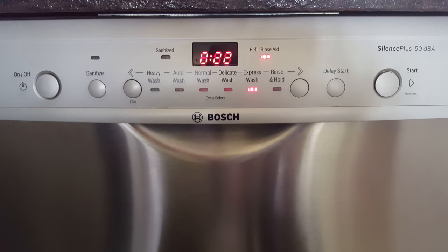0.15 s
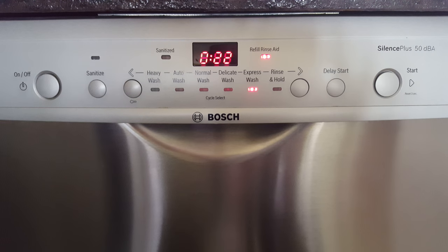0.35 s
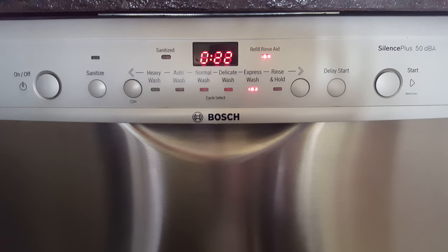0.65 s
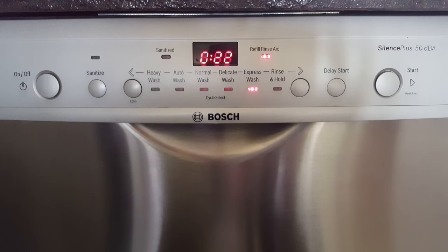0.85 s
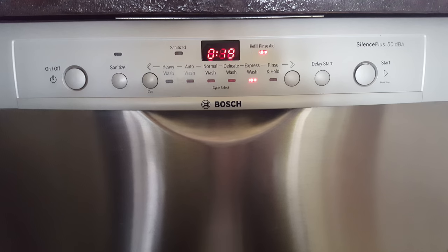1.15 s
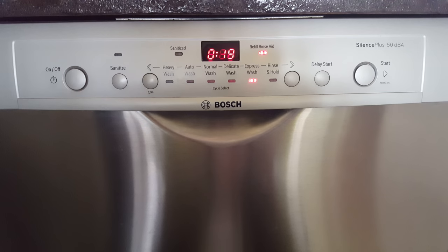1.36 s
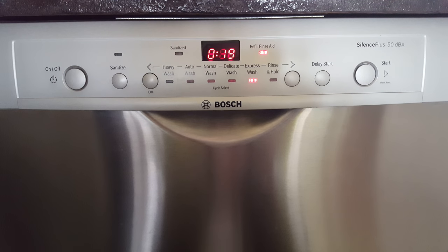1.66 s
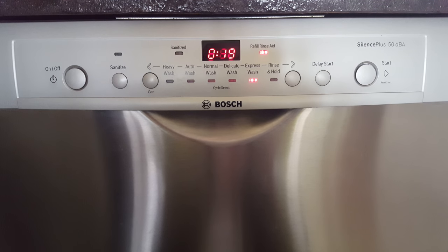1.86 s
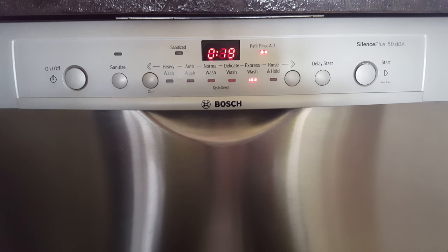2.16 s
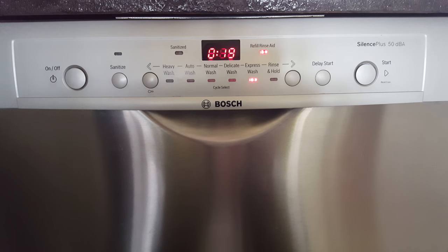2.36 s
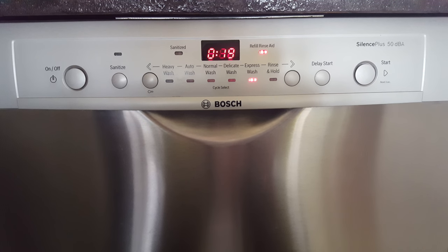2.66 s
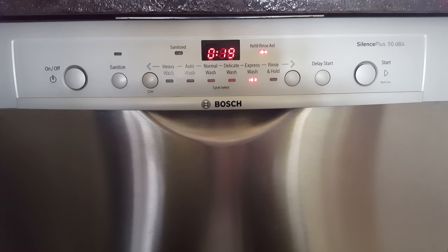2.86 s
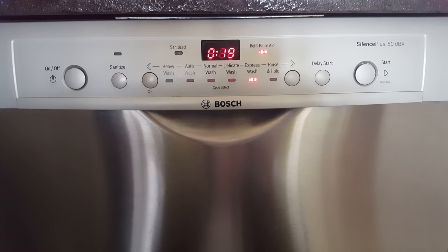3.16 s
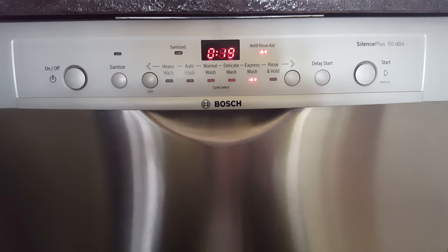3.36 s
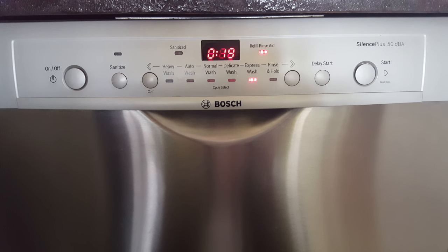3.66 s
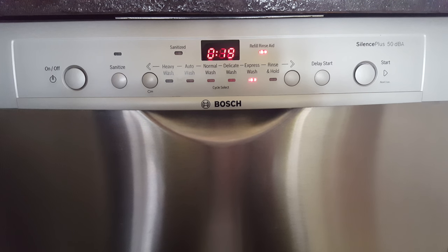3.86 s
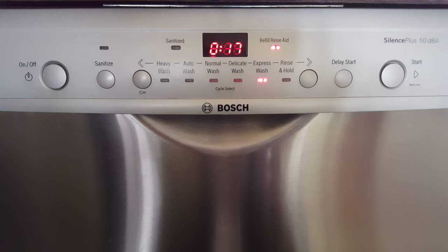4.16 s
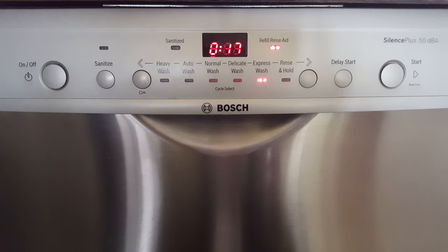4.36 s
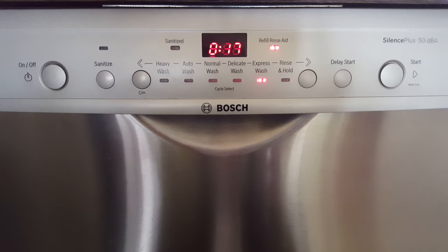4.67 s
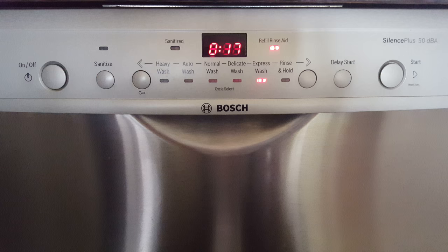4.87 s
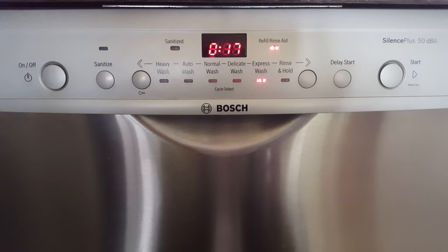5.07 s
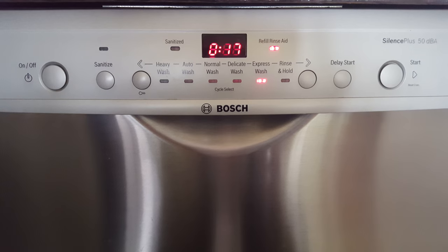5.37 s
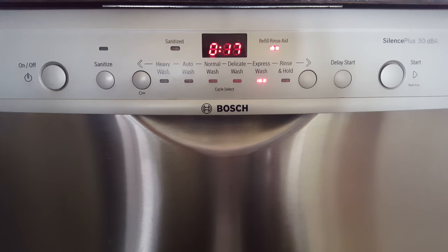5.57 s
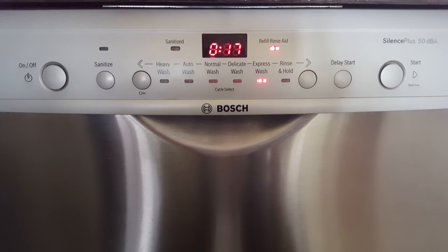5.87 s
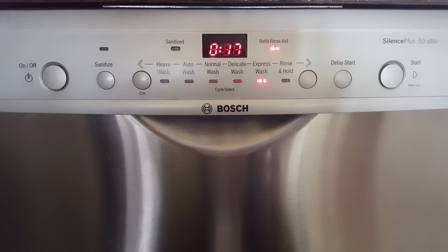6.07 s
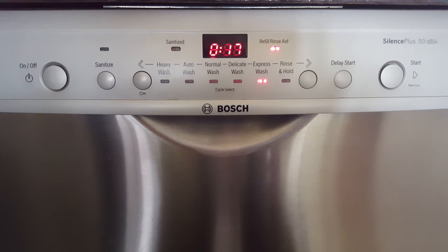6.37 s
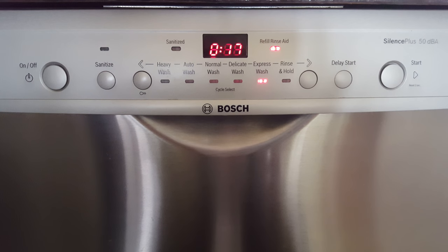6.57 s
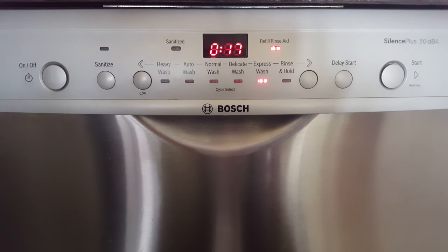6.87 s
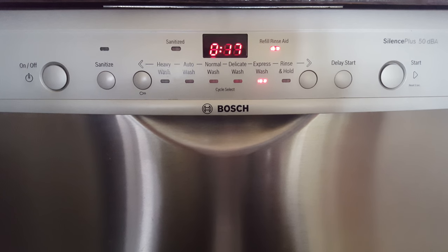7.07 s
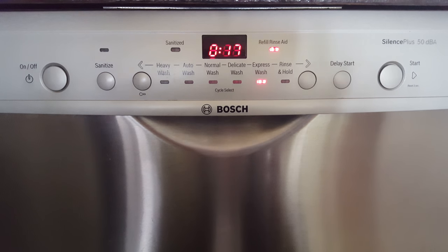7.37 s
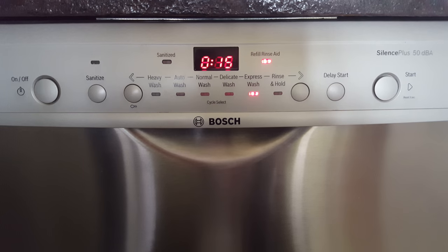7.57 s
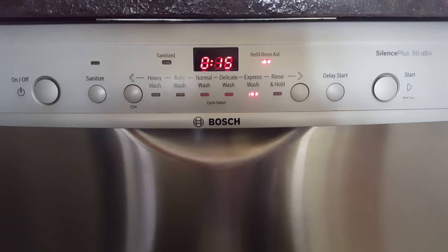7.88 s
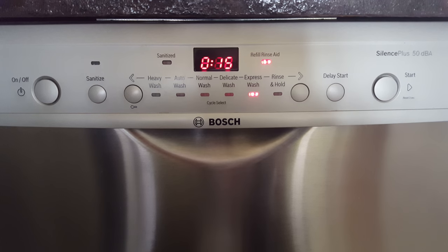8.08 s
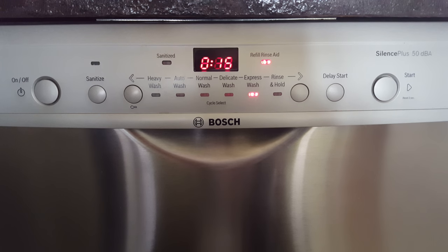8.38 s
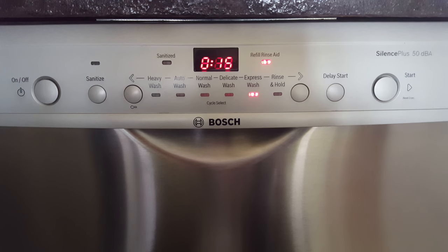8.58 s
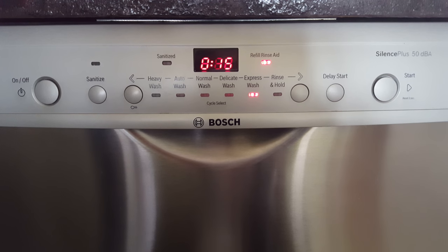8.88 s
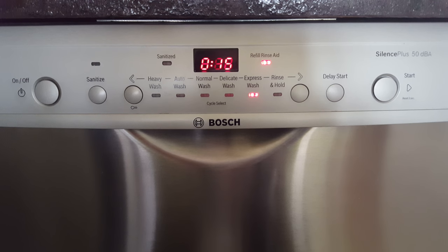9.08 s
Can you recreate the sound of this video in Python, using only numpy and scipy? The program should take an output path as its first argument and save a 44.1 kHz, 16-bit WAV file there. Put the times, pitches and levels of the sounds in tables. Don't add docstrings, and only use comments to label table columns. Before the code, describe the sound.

A dishwasher works behind its closed steel door, heard close up in a kitchen in stereo. Throughout, a low wavering pump drone with boomy cabinet resonance swells, stumbles and briefly breaks off, under muffled water wash and a soft, faint hiss. A barely audible thin high whine runs until about 7.5 s. At 0.5 s comes a hard dull knock, then dish clacks and rattles until about 0.95 s, where a tiny jump changes to another moment of the wash. Sparse ticks and drips follow, with a short crockery rattle at 2.3 to 2.5 s. Another slight jump falls at 4.1 s. The drone continues mostly alone until clacks and scuffs at 5.7 to 6.0 s. After isolated drips, the last jump comes at 7.5 s. A drip sounds at 8.5 s, then dishes knock and rattle again from 8.9 to 9.15 s, the hum still running.

```python
import sys
import numpy as np
from scipy import signal
from scipy.fft import rfft, irfft, next_fast_len
from scipy.io import wavfile
from scipy.ndimage import uniform_filter1d

SR = 44100
rng = np.random.default_rng(int(sys.argv[2]) if len(sys.argv) > 2 else 0)


def master(y):
    cut = np.clip(np.atleast_2d(y).T, -1, 1)
    pcm = np.round(cut * 32767)
    wavfile.write(sys.argv[1], SR, pcm.astype(np.int16))


def attenuation_scalar(level_db):
    decades = np.asarray(level_db, float) / 20
    return 10 ** decades


N = 406602
PADDED = next_fast_len(N)
HZ = np.maximum(np.fft.rfftfreq(PADDED, 1 / SR), 1)


def rms_one(x):
    return x / np.sqrt(np.mean(x ** 2) + 1e-20)


def in_time(rows):
    s, *columns = np.transpose(rows)
    return [np.interp(np.arange(N) / SR, s, c) for c in columns]


def swells(rows, width_s):
    t = np.arange(0, N / SR + .01, .005)
    change_db = sum(db * np.exp(-.5 * ((t - s) / width_s) ** 2) for s, db in rows)
    return in_time(np.transpose([t, change_db]))[0]


def drift(rate):
    r = np.exp(-80 * np.pi * rate / SR)
    chance = rng.standard_normal(N // 40 + 2002)
    slow = signal.lfilter([1], [1, -2 * r, r * r], chance)[2000:]
    return np.interp(np.arange(N) / 40, np.arange(len(slow)), rms_one(slow))


def at_hz(points):
    hz, value = np.transpose(points)
    return np.interp(np.log(HZ), np.log(hz), value)


def shaped(x, gain):
    return irfft(rfft(x, PADDED) * gain, PADDED)[..., :N]


def resonances(modes, steep):
    power = 0
    for hz, width, db in modes:
        detuning = (HZ - hz ** 2 / HZ) / width
        power = power + attenuation_scalar(2 * db) / (1 + detuning ** 2) ** steep
    return np.sqrt(power)


# f/Hz, likeness/1
LIKENESS = [(30, .95), (60, .989), (130, .997), (250, .96), (390, .72), (500, .9), (800, .62), (1100, .33),
            (3000, .3), (6000, .42), (15000, .3)]
# f/Hz, left-right level/dB
BALANCE_DB = [(30, .5), (200, .2), (700, -.4), (2400, -.6), (4400, -1.2), (8000, .8), (14000, 1.5)]
PORT_LAG_S = 0.000234


def at_ports(direct, left, right, gain):
    alike = np.clip(at_hz(LIKENESS), 0, 1)
    late = np.exp(-2j * np.pi * HZ * PORT_LAG_S * np.clip(HZ / 800, 0, 1))
    shared = np.sqrt(alike) * rfft(direct, PADDED) * [np.ones_like(late), late]
    own = np.sqrt(1 - alike) * rfft([left, right], PADDED)
    tilt = attenuation_scalar(at_hz(BALANCE_DB) * [[.5], [-.5]])
    return rms_one(irfft((shared + own) * gain * tilt, PADDED)[:, :N])


def evened(x, size, share):
    power = np.mean(x ** 2, axis=0)
    level = uniform_filter1d(uniform_filter1d(power, size=size), size=size)
    return rms_one(x / (level + 0.028) ** (share / 2))


# t/s, left step/1, right step/1
JOINTS = [
    (.95356, -.028, -.022),
    (4.08386, .032, .034),
    (7.49321, .036, .019),
]


def per_moment(values):
    return np.take(values, np.searchsorted([s for s, left, right in JOINTS], np.arange(N) / SR))


def joints():
    jumps = np.zeros((2, N))
    for s, left, right in JOINTS:
        jumps[:, round(s * SR)] = left, right
    return signal.lfilter([1], [1, -np.exp(-1 / (0.0007 * SR))], jumps + 1e-18)


# left t/s, right t/s, level/dB
ECHOES = [(.0031, .0038, -16), (.0074, .0066, -17), (.0123, .0139, -18), (.0197, .0181, -19),
          (.0283, .0307, -21)]


def kitchen(x):
    echoes = sum(attenuation_scalar(db) * np.exp(-2j * np.pi * HZ * [[left], [right]]) for left, right, db in ECHOES)
    return shaped(x, 1 + echoes / (1 + (500 / HZ) ** 4))


# f/Hz, level/dB
WHINE = [(9711, -86), (10022, -94), (10333, -85)]
WHINE_STOP_S = 7.49


def whine():
    t = np.arange(N) / SR
    lines = sum(attenuation_scalar(db + 3) * np.sin(2 * np.pi * hz * t + [[0], [.8]]) for hz, db in WHINE)
    return lines * (t < WHINE_STOP_S)


# f/Hz, width/Hz, level/dB in each of the four moments
GAPS = [(5200, 740, -80, -78.5, -77, -80), (9300, 900, -81, -87, -87, -82),
        (10500, 700, -79, -89, -79.5, -85), (10770, 380, -93, -92, -93, -80),
        (11300, 450, -82, -81, -83.5, -81), (12560, 740, -83, -82, -82, -82)]


def gaps():
    white = rng.standard_normal((2, N))
    out = 0
    for hz, width, *levels_db in GAPS:
        breath = rms_one(shaped(white, resonances([(hz, width, 0)], steep=3.1)))
        out = out + attenuation_scalar(per_moment(levels_db) + 1.2 * drift(0.5)) * breath
    return out


def drops():
    out = np.zeros((2, N))
    for hz in np.geomspace(1500, 12500, num=10):
        sizes = attenuation_scalar(1.2 * np.minimum(rng.exponential(1, N), 3))
        born = (rng.random(N) < 14.0 / SR) * sizes
        sides = attenuation_scalar(rng.normal(0, 3.5, (2, N)))
        r, w = attenuation_scalar(-60 * hz / (9.0 * SR)), 2 * np.pi * hz / SR
        poles = [1, -2 * r * np.cos(w), r * r]
        ring = signal.lfilter([0, np.sin(w)], poles, born * sides + 1e-18)
        level_db = -53 - 3.8 * np.log2(hz / 1500)
        out += attenuation_scalar(level_db) * signal.lfilter([1 - r, 0, r - 1], poles, ring)
    return out


def splashes(grain_db, flicker_db):
    sizes = attenuation_scalar(grain_db * np.minimum(rng.exponential(1, N), 6))
    swell = attenuation_scalar(flicker_db * (drift(32) + 0.6 * drift(13.5)))
    return rng.standard_normal((3, N)) * sizes * swell


# f/Hz, spectral level/dB per Hz
WASH = [(280, -7.5), (375, -9), (480, -5), (507, -5.5), (578, -3.5), (630, -8), (688, -6.5), (855, -7.5),
        (1050, -12.5), (1500, -12.5), (2110, -19), (2660, -23), (6500, -44), (8450, -60), (14300, -120)]
# f/Hz, spectral level/dB per Hz
MIST = [(3530, -6.5), (6000, 0), (9040, -4), (10700, 2), (13000, -4), (15200, -3.5), (16000, -24)]
WASH_DB = [-47.5, -48.5, -48, -48]
MIST_DB = [-66, -66.5, -66.5, -66]
JET_SWAY_DB, JET_SWAY_PER_S = 0.93, 0.51


def jets():
    sway_db = JET_SWAY_DB * drift(JET_SWAY_PER_S)
    wash_db, mist_db = per_moment(WASH_DB) + 0.34 * sway_db, per_moment(MIST_DB) + sway_db
    out = 0
    for spectrum, level_db, grain_db, split_hz in ((WASH, wash_db, 1.5, 1800), (MIST, mist_db, 2.2, 9500)):
        below = 1 / (1 + (HZ / split_hz) ** 4)
        gain = attenuation_scalar(at_hz(spectrum))
        halves = [gain * np.sqrt(below), gain * np.sqrt(1 - below)]
        parts = [np.linalg.norm(h) * at_ports(*splashes(grain_db, flicker_db=1.71), h) for h in halves]
        out = out + attenuation_scalar(level_db) * rms_one(sum(parts))
    return out


# t/s, peak level/dB, centre f/Hz, rim against body level/dB
TOUCHES = [(0.6495, -38, 2300, -11), (0.68, -35, 1460, -4), (0.6978, -28.5, 1760, -25),
           (0.725, -39, 1500, -4), (0.845, -45, 1500, -2), (0.8167, -35, 1400, -12),
           (0.8232, -29.5, 1440, -9), (0.934, -45, 2100, -14), (1.131, -46, 2000, -7),
           (1.899, -44.5, 2200, -16), (2.2946, -32, 1600, -16), (2.3294, -41, 1550, -16),
           (2.4019, -43, 1430, -14), (2.429, -38, 1310, -5), (2.4399, -36, 1210, -5),
           (2.4525, -38.5, 1920, -14), (2.48, -51, 2200, -10), (4.0966, -38, 1400, -9),
           (5.6865, -49, 2600, -6), (5.7155, -34.5, 1480, -8), (5.7386, -27.5, 1650, -16),
           (5.762, -48, 1700, -10), (5.78, -42, 1300, -10), (5.8525, -45, 2000, -7),
           (5.869, -37, 1500, -15), (5.9716, -31, 1530, -12), (8.8633, -51, 2000, -13),
           (8.8961, -26.5, 1400, -18), (8.9025, -44, 2300, -7), (8.9222, -33, 1740, -9),
           (8.981, -51, 2400, 0), (9.037, -42, 1500, -4), (9.0643, -42, 1790, -19), (9.076, -40, 1650, -16),
           (9.0895, -38, 1200, -15)]
# t/s, peak level/dB, centre f/Hz, rim against body level/dB
SCUFFS = [(0.652, -38, 1420, -18), (0.809, -39, 1490, -11), (0.845, -52, 1370, -10), (0.87, -44, 1400, -10),
          (0.938, -39, 1290, -14), (2.2722, -39, 1550, -9), (2.3115, -37, 1600, -11),
          (2.458, -40, 1600, -3), (5.6932, -37, 1610, -10), (5.8465, -31.5, 1610, -8),
          (5.88, -38, 1610, -15), (8.8747, -32, 1490, -10), (8.926, -41, 1100, -6), (8.986, -41, 900, -11),
          (9.0458, -31, 1400, -21), (9.068, -37, 1510, -20), (9.156, -41.5, 1400, -13)]
# f/Hz, width/octave, level/dB
OVERTONES = [(2300, 0.4, -1.5), (3000, 0.82, -9.5), (4600, 0.64, -10.5)]
# f/Hz, width/octave, level/dB
RACK = [(800, 1, -8.5), (440, 0.4, -8)]
# t/s, level/dB, centre f/Hz, left-right level/dB
DRIPS = [(.303, -54.5, 4960, -9), (.37, -52.5, 3350, 3), (.471, -52, 2670, -7), (.569, -50, 2220, -8),
         (.65, -51, 3790, 8), (0.823, -50, 4700, 2), (1.178, -55, 2600, 2), (2.268, -56, 4700, 5),
         (2.384, -47, 1740, -3), (2.557, -53, 3180, 3), (2.731, -57, 4300, 0), (3.049, -56, 3000, 1),
         (3.739, -57, 5300, 2), (4.038, -53.5, 5200, -5), (2.4295, -54, 4600, 0), (4.443, -55, 3600, 0),
         (4.854, -51, 2170, 1), (.611, -57, 4000, 0), (5.867, -41, 1580, 5), (5.997, -49, 3020, 12),
         (6.724, -55, 4450, 2), (2.452, -51, 4700, 0), (7.299, -55, 2920, 1), (7.467, -49.5, 2080, 3),
         (8.528, -43, 3400, 1), (8.703, -50.5, 3000, -1), (8.703, -60, 6500, 1), (8.983, -60, 3700, 2),
         (9.04, -36, 800, -2), (9.124, -60, 2200, 5),
         (.1705, -60, 3200, -1), (.886, -59, 4600, 0), (1.014, -63, 4200, 0), (1.06, -58, 4200, 0),
         (1.15, -64, 5200, 0), (1.178, -57, 5000, 0), (1.4336, -56, 3750, -1), (1.498, -61, 4100, 0),
         (1.972, -63, 8500, 0), (2.0787, -59, 10300, 2), (2.556, -57, 5000, 0), (2.6658, -57, 3520, 0),
         (2.902, -54, 3110, 0), (3.045, -59, 4510, 0), (3.739, -60, 3500, 0), (3.7544, -64, 7740, -1),
         (3.79, -60, 3500, 0), (3.9005, -60, 8350, 0), (3.9494, -61, 7600, 0), (4.325, -60, 3700, 0),
         (4.446, -57, 4800, 1), (4.5226, -56, 2640, 0), (4.662, -62, 7500, 0), (4.69, -59, 4000, 0),
         (4.8434, -51, 2200, 1), (5.1846, -62, 2810, 0), (5.2939, -61, 4830, 0), (5.2939, -60, 2890, 0),
         (5.942, -61, 4200, 0), (6.305, -52, 2200, 2), (6.574, -60, 3800, -1), (6.712, -52, 2300, 0),
         (6.72, -58, 3200, 0), (6.9591, -58, 3300, -1), (7.17, -60, 4200, 0), (7.325, -60, 5000, 0),
         (8.065, -59, 6500, 0), (8.7026, -57, 8200, 1), (8.715, -57, 4800, 0), (8.824, -63, 5640, 0),
         (.809, -62, 4100, 0), (2.268, -56, 3900, 0), (5.972, -44, 2450, 2), (2.4625, -59, 6060, 0),
         (8.528, -58, 4460, 1), (9.065, -56, 5300, -1), (9.077, -57, 4300, 0)]
# t/s, level/dB, centre f/Hz, left-right level/dB
SPITS = [(0.68, -44.5, 10700, 3.0), (2.4523, -48, 9830, 2.5), (2.8669, -49.5, 6800, -2),
         (2.9696, -51, 11300, 0.5), (4.925, -53, 11000, 2.0), (8.8777, -48, 10700, 2.5),
         (9.0414, -51, 10300, -5), (9.0638, -47.5, 10500, 3), (9.0887, -51, 10300, 0.5),
         (0.8175, -48, 11600, 0.5), (2.2942, -52, 10500, 2.5), (2.4324, -51, 9650, 1.5),
         (5.7149, -56, 7230, 2.5), (5.8471, -52, 11500, -0.5), (8.8972, -52, 10600, 2.0)]
TOUCH_DB, TOUCH_OCTAVES, TOUCH_PAN_DB, RIM_LATE_S = -5.5, 0.65, 3.0, 0.0004
DRIP_OCTAVES, SPIT_DB = 0.32, -6.5


def contacts_list():
    rows = []
    for table, sliding in ((TOUCHES, False), (SCUFFS, True)):
        all_pans = rng.normal(0, TOUCH_PAN_DB, (len(table), 1 + len(OVERTONES)))
        for (s, peak_db, hz, rim_db), pans in zip(table, all_pans):
            db = peak_db + TOUCH_DB
            rows.append((s, db, hz, TOUCH_OCTAVES, pans[0], sliding))
            for (rim_hz, octaves, up_db), pan_db in zip(OVERTONES, pans[1:]):
                rows.append((s + RIM_LATE_S, db + rim_db + up_db, rim_hz, octaves, pan_db, sliding))
            for low_hz, octaves, low_db in RACK:
                rows.append((s, db + low_db, low_hz, octaves, 0, sliding))
    rows += [(s, db, hz, DRIP_OCTAVES, pan_db, False) for s, db, hz, pan_db in DRIPS]
    return rows + [(s, db + SPIT_DB, hz, DRIP_OCTAVES, pan_db, False) for s, db, hz, pan_db in SPITS]


TOUCH_T60_S, SCUFF_T60_S, SCUFF_RISE_S = 0.016, 0.035, 0.0016
FIRST_CONTACT = 5.5


def band_passed(x, order, edges_hz):
    return signal.sosfilt(signal.butter(order, edges_hz, "band", fs=SR, output="sos"), x)


def taps():
    rows, out, t = contacts_list(), np.zeros((2, N + 4000)), np.arange(4000) / SR
    tail = 0.044 * attenuation_scalar(-60 * t / 0.15)
    touch_fall = attenuation_scalar(-60 * t / TOUCH_T60_S) + tail
    scuff_fall = np.minimum(t / SCUFF_RISE_S, 1) * attenuation_scalar(-60 * t / SCUFF_T60_S) + tail
    noises = rng.standard_normal((len(rows), 2, 4000))
    for (s, db, hz, octaves, pan_db, sliding), noise in zip(rows, noises):
        chatter = noise + .7 * noise[::-1]
        push = chatter * (scuff_fall if sliding else touch_fall)
        push[:, 0] = 0 if sliding else FIRST_CONTACT
        band_hz = hz * 2 ** (np.clip(octaves, .25, 2) * np.array([-.4, .4]))
        band = band_passed(push, 2, np.clip(band_hz, 200, .4 * SR))
        edge = band_passed(push, 3, [0.96 * hz, min(hz + 3800, .4 * SR)])
        burst = band + attenuation_scalar(-30) * signal.lfilter([.15], [1, -.85], edge)
        onset = burst[:, :300 if sliding else 200]
        burst = burst / np.sqrt(np.mean(onset ** 2, axis=1, keepdims=True))
        i = round(s * SR)
        out[:, i:i + 4000] += burst * attenuation_scalar(db - 4.0 + pan_db * np.array([[.45], [-.45]]))
    return out[:, :N]


# f/Hz, width/Hz, level/dB
CROCKERY = [(845, 180, 9), (1400, 240, 6.5), (1700, 240, -20), (2200, 160, 4.5), (2950, 400, -9)]
# f/Hz, width/Hz, level/dB
CUTLERY = [(3600, 2000, -0.5), (4800, 430, 5), (9800, 2100, -2), (13500, 3700, -4.5)]
# t/s, crockery level/dB, cutlery level/dB
SWEEPS = [(.56, -44, -58), (.656, -42, -57), (.816, -36.5, -52), (2.298, -40, -50.5), (2.43, -51, -52.5),
          (2.456, -41, -51), (5.714, -45, -52), (5.85, -38, -54), (5.97, -44, -71), (8.88, -36.5, -60),
          (9.046, -44, -57), (9.156, -55, -68)]
SWEEP_RISE_DB_PER_S, CROCKERY_FALL_DB_PER_S, CUTLERY_FALL_DB_PER_S = 500, 107, 182


def rattle():
    t, level = np.arange(N) / SR, np.zeros((2, N))
    for s, *levels_db in SWEEPS:
        fall_db = np.outer([CROCKERY_FALL_DB_PER_S, CUTLERY_FALL_DB_PER_S], t - s)
        loss_db = np.maximum(SWEEP_RISE_DB_PER_S * (s - t), fall_db)
        level += attenuation_scalar(np.reshape(levels_db, (2, 1))) * attenuation_scalar(-loss_db)
    struck = rng.random((3, N)) < 2500 / SR
    force = attenuation_scalar(2.6 * np.minimum(rng.exponential(1, (3, N)), 3))
    contacts = struck * rng.standard_normal((3, N)) * force
    crockery = attenuation_scalar(-9.0) * level[0] * at_ports(*contacts, resonances(CROCKERY, steep=1.6))
    cutlery = attenuation_scalar(-10.0) * level[1] * at_ports(*contacts, resonances(CUTLERY, steep=1.6))
    return crockery + cutlery


# f/Hz, spectral level/dB per Hz
KNOCK_COLOUR = [(250, -31), (560, 1), (1100, -10), (1750, -3), (2400, -5), (3800, -15), (5630, -9),
                (6750, -23), (8600, -16.5), (14200, -23), (15800, -30)]
# f/Hz, left-right level/dB
KNOCK_PAN = [(1000, -1), (2000, -3), (4400, -5.5), (8000, 0.5), (14000, 1.5)]
KNOCK_S, KNOCK_DB = .5275, -27


def knock():
    t = np.arange(N) / SR - KNOCK_S
    after, before = np.clip(t, 0, 1), np.clip(-t, 0, 1)
    colour = attenuation_scalar(at_hz(KNOCK_COLOUR) + at_hz(KNOCK_PAN) * [[.5], [-.5]])
    bright = rms_one(shaped(rng.standard_normal((2, N)), colour))
    dull = signal.sosfilt(signal.butter(4, 2800, fs=SR, output="sos"), bright)
    snap = 1.1 * np.exp(-((t - .002) / .0017) ** 2)
    crack = (t >= 0) * (snap + 0.5 * attenuation_scalar(-60 * after / 0.058) + 0.049 * attenuation_scalar(-60 * after / 0.63))
    slide = (t < 0) * 0.5 * attenuation_scalar(-60 * before / 0.033)
    body = (t >= 0) * .5 * attenuation_scalar(-60 * after / 0.11)
    thud = .75 * np.sin(2 * np.pi * 560 * after) * attenuation_scalar(-60 * after / .1)
    return attenuation_scalar(KNOCK_DB) * (bright * crack + dull * (body + slide) + thud)


# f/Hz, width/Hz, level/dB
DOOR_MODE = [(408.7, 14.6, 0)]
# t/s, change of level/dB
SLAPS = [(.56, 13), (.85, 9.5), (1.3, -18), (1.57, 9.5), (2.0, 4.5), (2.3, 9), (2.6, 7.5), (2.88, 9.5),
         (3.4, -8), (4.0, 9), (4.6, 3), (4.85, 11.5), (5.1, 5.5), (5.7, 4.5), (5.95, 3), (6.6, 2),
         (7.2, 10.5), (7.75, 10), (8.1, -3), (8.4, 3), (8.57, 9), (8.9, 9.5), (9.15, 8)]
DOOR_DB, SLAP_S = -55, 0.065


def door():
    ringing = at_ports(*rng.standard_normal((3, N)), resonances(DOOR_MODE, steep=1.24))
    return attenuation_scalar(DOOR_DB + swells(SLAPS, SLAP_S)) * evened(ringing, size=4000, share=0.79)


# t/s, change of boom level/dB
HEAVES = [(.2, 0.5), (.58, 2.5), (.95, -1.5), (1.17, 0.5), (1.45, -2), (2.1, 0), (2.3, 1.5), (2.8, -1.5),
          (3.3, 0), (3.8, -2.5), (4.2, -4), (4.65, -1.5), (5.05, 0.5), (5.4, -2.5), (5.9, 1), (6.35, 0),
          (6.8, 1.5), (7.1, 0.5), (7.6, -4), (8.15, 1), (8.47, -3.5), (8.85, 3.5), (9.1, 3)]
# t/s, dip of level/dB
LULLS = [(0.125, -10), (0.685, -7), (1.222, 0), (1.664, -2.5), (1.957, -2.5), (2.193, -1), (2.249, 0),
         (2.397, -4), (2.644, -13), (2.825, -5), (2.923, -2), (3.327, 0.5), (3.49, -7), (3.664, -8),
         (3.794, -8), (4.025, -12), (4.245, -10), (4.565, -12), (4.669, 0.5), (4.825, -14), (4.921, 0.5),
         (5.293, -8), (5.488, -2), (5.658, -5), (5.791, -2), (6.025, -4), (6.132, -2), (6.218, -9),
         (6.333, -5), (6.465, -3), (6.594, -4), (6.812, 1), (6.989, -6), (7.236, -4), (7.374, -3),
         (7.576, -7), (7.773, -4), (7.939, -2), (8.068, -1), (8.252, 1.5), (8.372, -3), (8.522, -9),
         (8.696, -6), (8.764, -7), (8.912, -1)]
HEAVE_S, LULL_S = 0.074, 0.021
CABINET_HZ, CABINET_DB, CABINET_WAVER = 154.1, -43.5, 0.0291


def cabinet():
    turns = np.cumsum(CABINET_HZ * (1 + CABINET_WAVER * drift(11.6))) / SR
    level_db = CABINET_DB + swells(HEAVES, HEAVE_S) + 2.1 * swells(LULLS, LULL_S) + 2.0 * drift(15)
    return np.sqrt(2) * attenuation_scalar(level_db) * np.sin(2 * np.pi * turns + [[0], [-.08]])


# f/Hz, width/Hz, level/dB
LOW_BOOM = [(64.4, 11.6, -13), (86, 10.4, -8.5), (113, 18, -34), (159.6, 43, -7.5), (184, 70, -9.5)]
# f/Hz, width/Hz, level/dB
VANE_BAND = [(236, 19, -9), (262.5, 47, -4.5), (296, 11.6, -6.5)]
# f/Hz, width/Hz, level/dB
UPPER_BOOM = [(340, 26.5, -3.5), (467.4, 30.5, -5)]
# t/s, change of load level/dB
SURGES = [(0, 3), (.18, -5), (.38, -1), (.72, 2), (1.18, -0.5), (1.72, 2.5), (2.0, 3.5), (2.23, -1.5),
          (2.68, 6.5), (2.87, 1), (3.0, 1), (3.27, -8.5), (3.4, 1), (3.62, -2.5), (3.72, 6.5), (3.82, -1.5),
          (3.97, 1.5), (4.65, 0), (4.89, 3.5), (5.27, -9), (5.75, 4.5), (5.85, -1.5), (5.96, 5.5),
          (6.11, -0.5), (7.19, -3), (7.63, 3), (7.91, 3), (8.45, -2.5), (8.58, 4), (9.15, 2), (.82, -0.5),
          (1.45, 2), (2.45, 0.5), (2.8, -1.5), (4.1, 1.5), (4.35, 1), (5.1, -5), (5.45, 1.5), (5.62, 3),
          (6.22, 2.5), (6.4, -0.5), (6.65, -0.5), (6.85, 1), (7.02, 2), (7.35, -3.5), (7.5, -1), (7.8, -5),
          (8.1, 0.5), (8.3, 1), (8.7, -1), (8.9, 2.5)]
# t/s, dip of level/dB
STUMBLES = [(0.141, -6), (0.481, -4), (0.583, -8.5), (1.018, -7.5), (1.136, -3), (1.567, -6),
            (2.195, -11.5), (2.306, -9), (2.385, -4), (2.605, -4), (2.692, -5), (2.875, -4.5),
            (3.161, -11.5), (3.243, -3.5), (3.465, -4), (3.639, -8.5), (3.807, -5.5), (4.0, -3.5),
            (4.261, -6.5), (4.37, -4), (4.544, -4.5), (4.615, -3.5), (4.773, -10.5), (5.039, -7.5),
            (5.29, -10), (5.408, -9), (5.526, -3.5), (5.696, -5.5), (5.841, -9.5), (6.122, -10),
            (6.388, -6.5), (6.698, -5), (6.862, -10), (6.957, -8.5), (7.322, -3), (7.422, -7.5),
            (7.587, -9), (7.732, -6), (7.848, -3), (7.971, -8.5), (8.308, -12.5), (8.449, -8.5),
            (8.791, -9), (9.104, -6), (9.163, -10)]
SURGE_S, STUMBLE_S = 0.038, 0.013
LOW_BOOM_DB, VANE_DB, UPPER_BOOM_DB = -42, -41, -52.5
LOW_FOLLOWS, UPPER_FOLLOWS = -0.08, -0.034
LOW_SWAY_DB, VANE_SWAY_DB, UPPER_SWAY_DB, SLOSH_PER_S = 1.24, 0.83, 2, 7.4
PUMP_HZ, VANE_SHARE_DB, VANE_NOISE_DB = 51.75, 1.0, -3.5
SLIP_HZ_PER_DB, VANE_LAG_RAD = 0.53, 0.13


def tub_band(modes):
    ringing = at_ports(*rng.standard_normal((3, N)), resonances(modes, steep=1.337))
    return evened(ringing, size=4000, share=0.49)


def tub():
    swing_db = swells(SURGES, SURGE_S)
    stumble_db = swells(STUMBLES, STUMBLE_S)
    slips = [(s, db * (-1) ** k) for k, (s, db) in enumerate(STUMBLES)]
    slip_hz = SLIP_HZ_PER_DB * swells(slips, STUMBLE_S)
    low_db = LOW_BOOM_DB + LOW_FOLLOWS * swing_db + swells(HEAVES, HEAVE_S) + LOW_SWAY_DB * drift(SLOSH_PER_S)
    vane_db = VANE_DB + swing_db + 1.12 * stumble_db + VANE_SWAY_DB * drift(SLOSH_PER_S)
    upper_db = UPPER_BOOM_DB + UPPER_FOLLOWS * swing_db + UPPER_SWAY_DB * drift(SLOSH_PER_S)
    turns = np.cumsum(PUMP_HZ * (1 + .011 * drift(14)) + slip_hz) / SR
    tone = np.sqrt(2) * attenuation_scalar(VANE_SHARE_DB) * np.sin(2 * np.pi * 5 * turns - [[0], [VANE_LAG_RAD]])
    vane = tone + attenuation_scalar(VANE_NOISE_DB) * tub_band(VANE_BAND)
    return attenuation_scalar(low_db) * tub_band(LOW_BOOM) + attenuation_scalar(vane_db) * vane + attenuation_scalar(upper_db) * tub_band(UPPER_BOOM)


def scene():
    echoing = kitchen(gaps() + drops() + jets() + taps() + rattle() + knock())
    return whine() + echoing + door() + cabinet() + tub()


def roll_off(x):
    return signal.sosfilt(signal.butter(12, 16600, fs=SR, output="sos"), x)


OFFSET = -.0006
CUTOFF_HZ = 16050


def record(dry):
    bass_cut = signal.sosfilt(signal.butter(3, 40, "high", fs=SR, output="sos"), dry)
    stepped = bass_cut + joints() + OFFSET
    mix = signal.sosfilt(signal.cheby2(16, 60, CUTOFF_HZ, fs=SR, output="sos"), stepped)
    return roll_off(mix)


dry = scene()
out = record(dry)
master(out)
```